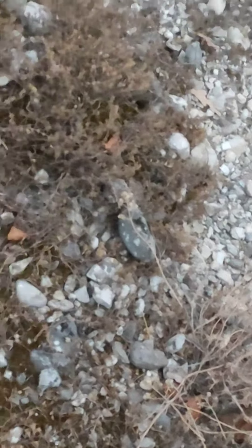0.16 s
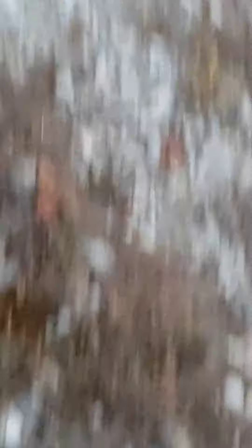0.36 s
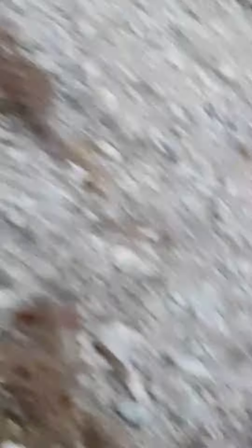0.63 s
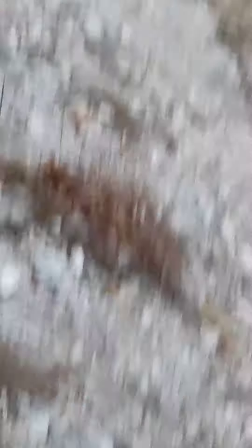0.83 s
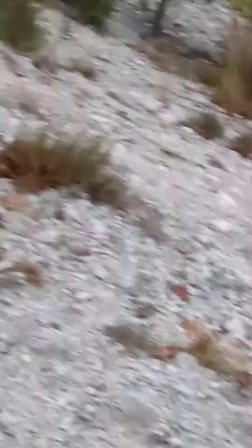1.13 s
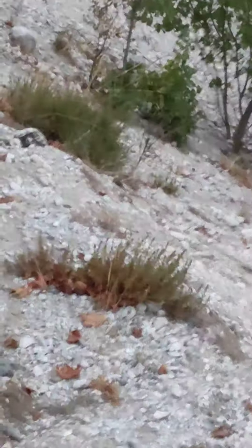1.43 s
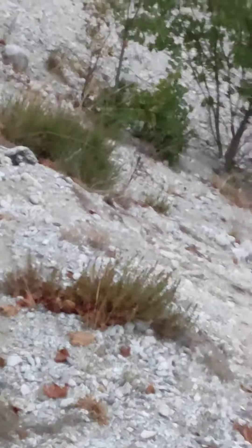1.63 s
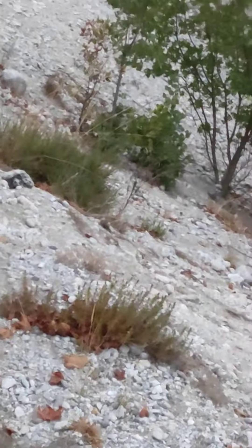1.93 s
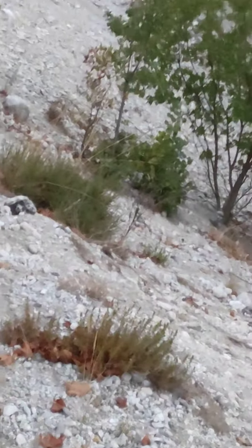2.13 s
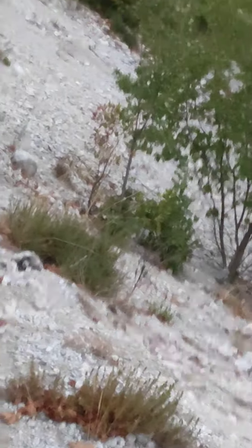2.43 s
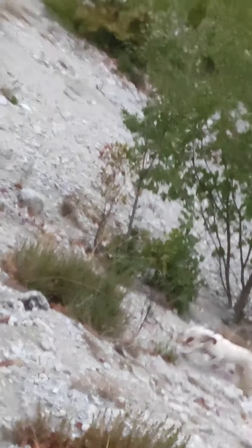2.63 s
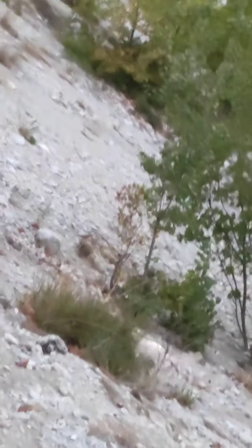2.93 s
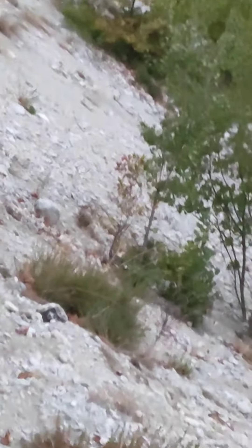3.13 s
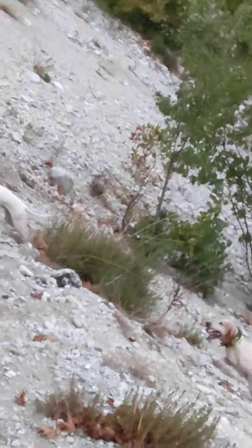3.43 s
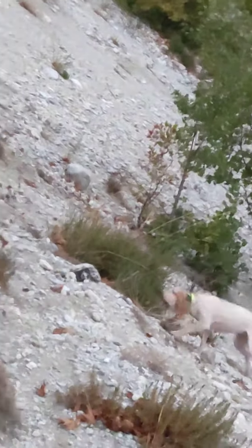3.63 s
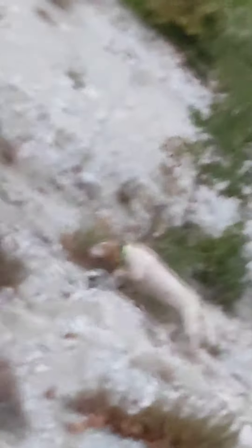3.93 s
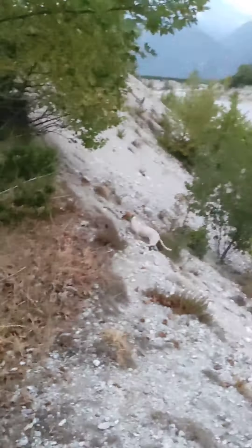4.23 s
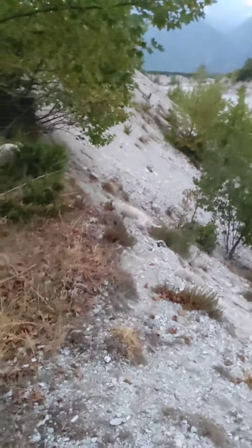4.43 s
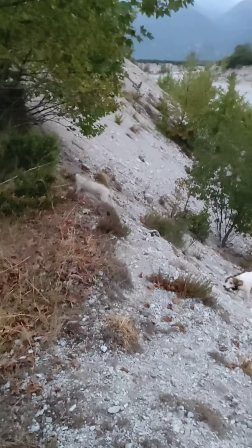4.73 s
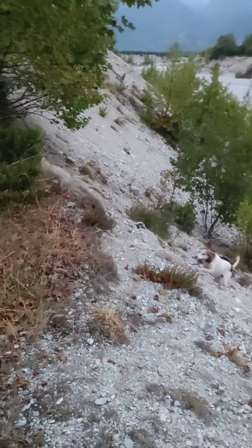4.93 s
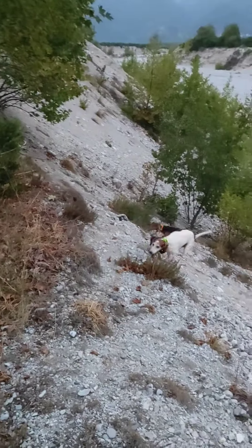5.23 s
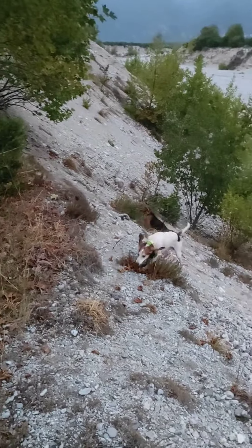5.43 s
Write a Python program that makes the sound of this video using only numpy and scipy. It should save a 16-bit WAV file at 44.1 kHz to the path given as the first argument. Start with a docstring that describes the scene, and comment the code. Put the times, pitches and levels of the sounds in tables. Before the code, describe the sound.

Outdoors on an open stony hillside, a few excited hounds give tongue. Soft hoarse yelps and stone knocks come first, then quick runs of barks and short held bays with thin whines between. The voices grow louder and clearer past the middle, then stop near five seconds, leaving sliding gravel, a crunching step and faint air. Handheld stereo phone, nearly dry with a weak hillside echo.

```python
"""Hounds give tongue on a scree slope: hoarse yelps and short bays open, while single stones knock underfoot.
Thin whines and a first snarl follow; then nearly pure bays ring out with yelps over them, until a last whine.
Each voice is a row of harmonics that breaks between clean tone and harsh, uneven cycles, plus breath noise.
Loose stones, made of tiny bursts of noise, slide throughout and swell under a few late steps.
Nearby rocks and the hillside return the voices faintly; a phone with two microphone ports hears it all."""
import sys
import numpy as np
from scipy import signal
from scipy.fft import rfft, irfft
from scipy.io import wavfile
from scipy.ndimage import uniform_filter1d

SR = 44100
rng = np.random.default_rng(int(sys.argv[2]) if len(sys.argv) > 2 else 0)


def master(y):
    """Save y as 16-bit WAV."""
    cut = np.clip(np.atleast_2d(y).T, -1, 1)
    pcm = np.round(cut * 32767)  # scale
    wavfile.write(sys.argv[1], SR, pcm.astype(np.int16))


N = 246078
TIME = np.arange(N) / SR  # s
PROGRESS = np.linspace(0, 1, 100)  # from the start of a call to its end
TOP_HZ = 15750  # nothing much is heard above this


def undb(db):
    """Turn decibels into a gain."""
    return 10 ** (np.asarray(db) / 20)


def unit(x):
    """Scale to an average strength (rms) of 1."""
    return x / np.sqrt(np.mean(x ** 2))


def along_hz(points, size):
    """Join the columns of a frequency table on a log axis, at the bins of a transform."""
    hz, *columns = np.transpose(points)
    bins = np.log(np.maximum(np.fft.rfftfreq(size, 1 / SR), 1))
    return [np.interp(bins, np.log(hz), column) for column in columns]


def colour(x, points):
    """Filter with the given (frequency, level) shape; its ring never comes before the sound."""
    size = 2048
    cepstrum = irfft(np.log(undb(along_hz(points, size)[0])))
    # folding the cepstrum onto its first half puts all of the ring after the sound
    response = irfft(np.exp(rfft(2 * cepstrum[:size // 2], size) - cepstrum[0]))
    return signal.fftconvolve(x, response)[:len(x)]


def wander(rate_hz, size):
    """Smooth random drift of rms 1: noise with the changes faster than rate_hz filtered down."""
    lead = SR // 4  # the filter settles here, then this part is dropped
    slow = signal.butter(3, rate_hz, fs=SR, output="sos")
    drift = signal.sosfilt(slow, rng.standard_normal(size + lead))
    return unit(drift[lead:])


def air(air_db=-55, apart=1.0):
    """Faint air over the valley: coloured noise that swells slowly and differs between the sides."""
    # colour of the open air: (frequency [Hz], level [dB])
    air_shape = [(25, -8.5), (100, -17.5), (190, 1), (600, -6.5), (2000, -12.5), (4000, -31)]
    mid, side = (unit(colour(rng.standard_normal(N), air_shape)) for _ in range(2))
    swell = undb(air_db + 2 * wander(2.6, N))
    return swell * np.array([mid + apart * side, mid - apart * side])


def handling(length_s=0.032):
    """Shifts of the hand and of the feet reach the phone as soft thuds of low noise."""
    # thuds: (time [s], level [dB], top frequency [Hz])
    thuds = [(.668, -39, 100.5), (3.46, -40, 230), (3.75, -49.5, 113.3)]
    return sum(undb(db) * np.exp(-abs(TIME - at) / length_s) * wander(top_hz, N)
               for at, db, top_hz in thuds)


def scree(grains_per_s=2200, slide_db=1, knock_db=-2, knock_s=0.0033, apart=0.77):
    """Countless tiny stone impacts, swelling under each step, and a few single knocks."""
    # sliding stones, before slide_db is added: (time [s], level [dB])
    slide = [(0, -51.5), (.45, -48.5), (.8, -49), (1.8, -48.5), (1.92, -44), (2.3, -44), (2.94, -50.5),
             (3.3, -44), (3.8, -46.5), (4.35, -48), (4.75, -47.5), (5, -46)]
    # feet digging into the scree: (time [s], level [dB], decay [s])
    steps = [(2.837, -26.5, 0.02), (3.555, -29, 0.017), (5.371, -34.5, 0.092)]
    # single stones knocking, before knock_db is added: (time [s], level [dB])
    knock_table = [(0.196, -26), (0.2325, -30), (0.3133, -27), (0.8996, -39), (0.9286, -38.5),
                   (2.5032, -29), (3.456, -25), (3.486, -38)]
    # ring of the small stones: (frequency [Hz], level [dB])
    stones = [(300, 2), (2500, 2.5), (3800, -0.5), (5500, 2.5), (7400, 11.5), (8800, 2), (9800, -9.5),
              (15000, -19)]
    step_rise_s = 0.0023  # a foot sinks in rather than strikes
    grain_spread_db = 2.2  # a few grains are much stronger than the rest

    slide_s, slide_levels_db = np.transpose(slide)
    flow = undb(np.interp(TIME, slide_s, slide_levels_db) + slide_db + 2.9 * wander(7.3, N))
    for at, step_db, decay_s in steps:
        rise = np.clip((TIME - at) / step_rise_s, 0, 1)
        flow = flow + undb(step_db) * rise * np.exp(-abs(TIME - at) / decay_s)
    hits = rng.random(N) < grains_per_s / SR
    sizes = hits * undb(grain_spread_db * np.minimum(rng.exponential(size=N), 5))
    knocks = sum(undb(db + knock_db) * (TIME > at) * np.exp(-abs(TIME - at) / knock_s)
                 for at, db in knock_table)
    strikes = flow * unit(sizes) + knocks
    stone_gain = np.sqrt(np.mean(undb(along_hz(stones, N)[0]) ** 2))
    mid, side = (colour(strikes * rng.standard_normal(N), stones) / stone_gain for _ in range(2))
    return np.array([mid + apart * side, mid - apart * side])


def hillside(x, t60_s=0.79, echo_db=-26, dull_hz=3000, build_s=0.24):
    """Stones and trees scatter a faint, dull tail, different at each port."""
    t = TIME[:SR]
    decay = np.exp(-np.log(1000) * t / t60_s)
    tail = rng.standard_normal((2, SR)) * decay * (1 - np.exp(-t / build_s))
    tail /= np.sqrt(np.sum(tail ** 2, axis=1, keepdims=True))
    tail = signal.sosfilt(signal.butter(1, dull_hz, fs=SR, output="sos"), tail)
    return undb(echo_db) * signal.fftconvolve(x[None], tail, axes=1)[:, :N]


def near_stones(x, scatter_db=-7, spread_s=0.033, small_hz=1100):
    """Nearby rocks scatter the voices, with opposite sign at each side; long waves pass them by."""
    t = TIME[:SR // 10]
    scatter = rng.standard_normal(len(t)) * np.exp(-t / spread_s)
    scatter /= np.linalg.norm(scatter)
    short_waves = signal.sosfilt(signal.butter(2, small_hz, "high", fs=SR, output="sos"), x)
    side = undb(scatter_db) * signal.fftconvolve(short_waves, scatter)[:N]
    return np.array([side, -side])


def call(start, length, pitch, first_db, second_db, top_db, rough, upper_db=-5,
         jitter=0.0385, jitter_hz=120, shimmer=0.28, rasp=0.98, rasp_hz=130,
         muzzle_db=-27, breathy=0.5, bounce=0.76, turn_hz=9, attack_s=.012, release_s=.014):
    """One call: the vocal folds beat evenly when clean, and stumble in period and force when rough."""
    # throat and mouth above the octave: (frequency [Hz], level [dB])
    throat = [(800, -19), (1300, -3.5), (1600, 2.5), (2150, -2), (2550, -16.5), (3000, -31), (4200, -60)]
    # thin high resonances of the muzzle: (frequency [Hz], level [dB])
    muzzle = [(1800, -13), (3000, -20.5), (4100, -23), (5600, -7), (6400, -9), (7400, -0.5), (8800, -17),
              (10000, -40.5)]
    alternation, hiss, tear = .5, 3.2, .018  # how strongly roughness alternates cycles, hisses, bends pitch
    mirror_rad, mirror_swing_rad = 1.572, 0.3  # ground reflection's lag per harmonic, and its drift

    end = start + length
    span = (TIME > start - attack_s) & (TIME < end + release_s)
    t = TIME[span]
    n = len(t)

    def stretch(curve):
        """Lay a number, or a curve over PROGRESS, along the time of the call."""
        return np.interp(t, start + length * PROGRESS, np.broadcast_to(curve, PROGRESS.shape))

    hz, first_db, second_db, top_db = (stretch(c) for c in (pitch, first_db, second_db, top_db))
    rough = np.clip(stretch(rough), 0, 1)

    # hoarse folds lurch in pitch over tens of ms and jitter from cycle to cycle
    lurch = (0.0042 + tear * rough) * wander(47.4, n)
    unsteady = lurch + jitter * rough * wander(jitter_hz, n)
    phase = 2 * np.pi * np.cumsum(hz * (1 + unsteady)) / SR

    # strong and weak cycles alternate now and then, which adds lines between the harmonics
    alternate = alternation * wander(37, n) * np.cos(phase / 2)
    force = 1 + np.tanh(rough * (shimmer * wander(89, n) + alternate))
    force /= np.sqrt(uniform_filter1d(force ** 2, size=900))  # slow changes of strength are evened out
    smear = np.clip(rasp * rough, 0, 1)

    def partial(k, share):
        """Harmonic k; a share of it is smeared into side bands."""
        skirt = wander(rasp_hz, n) * np.cos(k * phase) + wander(rasp_hz, n) * np.sin(k * phase)
        return np.sqrt(2 * (1 - share ** 2)) * np.cos(k * phase) + share * skirt

    # the ground mirrors the voice: as the head moves, single harmonics swell and sink
    mirror = mirror_rad + mirror_swing_rad * wander(turn_hz, n)
    pulses = 0
    for k in range(3, 20):
        reflected = 1 + bounce * np.cos(k * mirror)
        pulses = pulses + np.sqrt(2) * reflected * np.cos(k * phase) * (k * hz < TOP_HZ)
    turbulence = rng.standard_normal(n) * (1.82 + .5 * np.cos(phase))  # air noise peaks once a cycle
    source = force * (np.sqrt(1 - smear ** 2) * pulses + hiss * smear * turbulence)

    # the fundamental feels the uneven force least
    fundamental = undb(first_db) * np.sqrt(force) * partial(1, smear ** 2)
    octave = undb(second_db) * force * partial(2, smear)
    upper = undb(top_db + upper_db) * colour(source, throat)

    # the muzzle's airy sheen follows the whole effort, more gently than the loudness does
    effort = np.sqrt(undb(first_db) ** 2 + undb(second_db) ** 2 + (2 * undb(top_db)) ** 2)
    sheen = undb(muzzle_db) * effort ** 0.74 * colour(source + breathy * turbulence, muzzle) / 2

    ramp = np.minimum((t - start) / attack_s + .5, (end - t) / release_s + 1)
    gate = np.sin(np.pi / 2 * np.clip(ramp, 0, 1)) ** 2
    out = np.zeros(N)
    out[span] = gate * (fundamental + octave + upper + sheen)
    return out


def snarls():
    """Air torn between the teeth during two sharp barks: short swells of hiss."""
    # snarls: (start [s], length [s], level at the peak of the swell [dB])
    snarl_table = [(0.663, 0.15, -38), (3.883, 0.14, -37.5)]
    # ring of the bared teeth: (frequency [Hz], level [dB])
    teeth = [(1500, -30), (2300, -3), (2950, 0.5), (3500, -15.5), (4500, -22.5), (8000, -36)]
    swell = sum(undb(db) * np.sin(np.pi * np.clip((TIME - start) / length, 0, 1))
                for start, length, db in snarl_table)
    return swell * unit(colour(rng.standard_normal(N), teeth))


def whine(start, length, first_hz, last_hz, first_db, last_db, overtones_db, rough):
    """A thin squeak: one glide of pitch, slowing as it lands, and one glide of level."""
    glide_power, upper_re_octave_db = 1.7, 7.5
    pitch = last_hz + (first_hz - last_hz) * (1 - PROGRESS) ** glide_power
    db = first_db + (last_db - first_db) * PROGRESS
    octave_db = db + overtones_db
    return call(start, length, pitch, db, octave_db, octave_db + upper_re_octave_db, rough,
                attack_s=.014, release_s=0.017)


def yelp(start, length, first_hz, last_hz, first_db, second_db, top_db, late_db, rough):
    """A hoarse bark, harshest at both ends, whose pitch gives way as the breath runs out."""
    scoop, attack_db, attack_s = 0.0381, 9.5, .012  # it starts flat (share of pitch) and soft
    sag_power, fade_power = 2.6, 2.94  # pitch and breath hold, then give way late
    swell_db = 10.5  # the fundamental peaks mid-yelp
    closing_db = 2.5  # the octave sinks as the jaws close
    settle = 0.3  # share of roughness added at the ends and taken away mid-yelp

    middle = 4 * PROGRESS * (1 - PROGRESS)  # 0 at both ends, 1 halfway
    onset = np.exp(-length * PROGRESS / attack_s)
    pitch = first_hz * (1 - scoop * onset) + (last_hz - first_hz) * PROGRESS ** sag_power
    fade_db = attack_db * onset + late_db * PROGRESS ** fade_power
    return call(start, length, pitch,
                first_db - swell_db * (1 - middle),
                second_db - fade_db - closing_db * PROGRESS,
                top_db - fade_db,
                rough * (1 + settle * (1 - 2 * middle)), release_s=0.028)


def bay(start, length, hz, arch, lift, lift_s, swell_s, fade_s, first_db, second_db, top_db, rough):
    """A held note: scoops up to pitch, rounds to a purer tone, sags, and bends (mostly up) as it fades."""
    scoop, scoop_s = 0.0392, 0.016  # it starts flat by this share of its pitch
    sag_per_s = .13  # share of pitch lost each second as the breath runs down
    swell_db, full_fade_db = 19.5, 15  # depth of the fundamental's swell and fade
    closing_db, octave_fade = 12, 0.44  # the octave sinks as the mouth rounds; its share of the fade
    attack_db, attack_s = 5, 0.0082  # the overtones take a moment to build
    onset_rough = 0.073  # extra roughness before the note settles

    t = length * PROGRESS
    flat_start = scoop * np.exp(-t / scoop_s)
    hump = arch * np.sin(np.pi * PROGRESS) ** 4
    end_bend = lift * np.exp((t - length) / lift_s)
    pitch = hz * (1 - flat_start - sag_per_s * t + hump + end_bend)
    opening = np.clip(1 - t / swell_s, 0, 1)
    fade_db = full_fade_db * np.clip(1 - (length - t) / fade_s, 0, 1)
    build_db = attack_db * np.exp(-t / attack_s)
    return call(start, length, pitch,
                first_db - swell_db * opening - fade_db,
                second_db - build_db - closing_db * (1 - opening) ** 4 - octave_fade * fade_db,
                top_db - build_db - fade_db * (fade_db / full_fade_db) ** 4,
                rough + onset_rough * opening)


def hounds(chest_hz=400):
    """Bays, hoarse yelps, whines and snarls overlap; a small chest radiates little bass."""
    # Levels and pitches are starting points that each call then shapes; roughness is limited to 0-1.
    # held notes: (start [s], length [s], pitch [Hz], arch [share of pitch], end bend [share of pitch],
    # bend time [s], swell [s], fade [s], fundamental [dB], octave [dB], upper harmonics [dB], roughness)
    bays = [ (0.051, .12, 602.3, -.04, -0.059, .015, 0.018, 0.027, -21.5, -26, -34, 0.21),
            (0.164, 0.12, 623, -0.0071, -0.035, .03, 0.034, 0.026, -30, -28.5, -36.5, 0.62),
            (1.12, .11, 596.6, -0.035, 0.031, 0.041, 0.019, 0.058, -19, -35.5, -33.5, 0.23),
            (1.361, 0.37, 642, .06, 0.43, 0.025, 0.08, 0.11, -14.5, -27, -24.5, 0.15),
            (1.974, 0.18, 588.6, -0.0067, 0.57, 0.029, 0.046, 0.13, -17.5, -21, -37, 0.36),
            (2.222, 0.16, 642, 0, 0.16, 0.012, .055, 0.029, -11.5, -27.5, -24.5, 0.12),
            (2.567, 0.18, 630.6, -.01, 0.32, 0.024, .06, 0.064, -11, -21, -25.5, 0.089),
            (2.99, 0.18, 608.7, .025, 0.26, .08, 0.071, 0.051, -15.5, -23, -19, .12),
            (3.192, 0.077, 592.5, 0, 0.2, .04, .015, 0.083, -21.5, -27, -25, 0.5),
            (3.447, 0.15, 584, -0.01, -0.077, 0.065, .022, 0.09, -8.5, -17.5, -39.5, 0.15),
            (3.549, 0.2, 637.6, 0, 0.2, .018, 0.037, .05, -8.5, -24.5, -22, 0.29),
            (4.014, .2, 639.6, 0, .04, 0.017, .06, .04, -8, -20.5, -23.5, 0.19),
            (4.416, 0.21, 622.2, 0, 0.23, 0.01, 0.054, .1, -10, -22.5, -22.5, 0.08),
            (4.821, 0.12, 616.6, 0, -0.072, 0.014, .06, 0.031, -15.5, -49, -23.5, 0.76), ]
    # hoarse barks: (start [s], length [s], first pitch [Hz], last pitch [Hz], fundamental [dB],
    # octave [dB], upper harmonics [dB], late fade [dB], roughness)
    yelps = [ (.008, 0.052, 544, 471.5, -38, -28.5, -26, 4.5, 0.31),
             (0.164, 0.17, 518, 575, -45, -28, -39.5, 8, 0.36),
             (0.352, 0.029, 571, 425, -31, -35.5, -40.5, 8.5, 0.68),
             (0.698, 0.093, 948, 741, -21, -23, -24.5, 17, 1.07),
             (1.083, 0.099, 514, 494, -55, -16.5, -19.5, 12.5, 0.56),
             (1.195, 0.037, 534, 541, -46, -17.5, -27.5, 7.5, 0.17),
             (1.391, 0.049, 557, 500, -23.5, -19, -21, 10, 0.37),
             (1.44, .04, 512.6, 524, -43, -21, -25.5, 5, .25),
             (1.482, .022, 512, 405, -40.5, -27.5, -28, 10, .3),
             (1.527, 0.084, 541, 531, -48, -33, -45.5, 3, .45),
             (1.96, 0.072, 563.6, 510, -26.5, -13.5, -20.5, 8, .28),
             (2.028, 0.096, 500, 533, -48.5, -25, -26.5, 8, 0.76),
             (2.222, .13, 575, 516, -31, -17.5, -21.5, 10.5, 0.4),
             (2.372, 0.098, 552, 604, -55, -29, -43.5, 2.5, 0.34),
             (2.561, 0.096, 552, 477, -52.5, -20.5, -19, 8, 1.06),
             (3.045, .15, 588, 474.2, -19, -16, -19.5, 10.5, 0.59),
             (3.406, .056, 881, 643, -16.5, -19.5, -19.5, 2.5, 1.1),
             (3.436, 0.048, 595.7, 569, -23, -17.5, -34, 2, .45),
             (3.566, .135, 555.5, 535, -38, -26, -20.5, 2, .6),
             (3.904, .042, 841, 760, -10.5, -33, -10.5, 8, 0.46),
             (4.182, .13, 565.2, 432, -22.5, -21.5, -19, 18, 0.61),
             (4.209, 0.079, 663.6, 729, -18, -41, -19.5, 9.5, 0.64),
             (4.815, .13, 550, 442, -20.5, -16, -22.5, 5.5, 0.65), ]
    # gliding squeaks: (start [s], length [s], first pitch [Hz], last pitch [Hz], first level [dB],
    # last level [dB], octave against the fundamental [dB], roughness)
    whines = [ (0.683, .022, 1490, 1097, -28.5, -28.5, -14, 0.93),
              (0.799, 0.049, 633, 883, -36.5, -34.5, -16, .3),
              (1.063, .018, 813, 890, -21.5, -18.5, -4.5, 0.08),
              (1.303, 0.066, 1560, 1260, -38, -23, -16.5, 0.3),
              (1.371, 0.028, 1242, 1052, -16, -22.5, -5, .12),
              (1.928, 0.031, 781, 835, -38, -19.5, -1, 0.47),
              (2.174, .044, 1276, 1410, -38, -25.5, -21, .05),
              (2.49, 0.067, 945, 876, -24.5, -18, -8.5, 0.09),
              (2.744, 0.017, 1145, 1094, -28.5, -35, -19.5, 0.2),
              (3.02, 0.018, 878, 861, -24.5, -21.5, -3, .1), (3.39, 0.022, 796, 929, -16, -13.5, -18, 0.2),
              (3.548, 0.025, 967, 784, -16.5, -28.5, -17.5, 0.4),
              (3.677, 0.082, 1035, 1185, -36, -27.5, -21.5, 0.4),
              (3.762, .105, 1171, 977, -38, -32, -3.5, 0.3),
              (3.87, 0.017, 1557, 1470, -20.5, -23, -14.5, .06),
              (3.899, 0.038, 1193, 906, -11, -19.5, -9.5, .95),
              (3.943, .046, 753, 749, -9, -10, -17.5, 0.11),
              (3.997, 0.02, 777.4, 737, -10.5, -22.5, -27.5, .4),
              (4.006, 0.016, 969, 840, -12, -28, -11, 0.1),
              (4.416, 0.017, 958, 754, -13.5, -32.5, -13, 0.2),
              (4.76, 0.034, 506.5, 741, -33.5, -25, -13, .4),
              (4.789, 0.019, 781, 795, -18.5, -13, -16.5, 0), (5.299, .04, 1850, 1670, -47, -50, -20, 0.8),
              ]
    voices = sum(bay(*row) for row in bays)
    voices = voices + sum(yelp(*row) for row in yelps)
    voices = voices + sum(whine(*row) for row in whines)
    voices = voices + snarls()
    return signal.sosfilt(signal.butter(6, chest_hz, "high", fs=SR, output="sos"), voices)


def scene():
    """Add up the hounds, their reflections, the scree, the air and the handling thuds."""
    voices = hounds()
    return voices + near_stones(voices) + hillside(voices) + scree() + air() + handling()


def record(dry):
    """The phone's body shades and delays each port differently; the top is cut."""
    # the two ports: (frequency [Hz], left minus right [dB], left leads by [rad])
    port_table = [(380, 5, -.2), (620, .4, -1.15), (1150, 0, -.8), (2000, 2.7, .3), (5000, -1, 1.4),
                  (7600, -6, 2), (12000, -1.5, 1)]
    balance_db, lead = along_hz(port_table, N)
    sides = np.array([[.5], [-.5]])  # left and right each take half of the difference
    ports = undb(sides * balance_db) * np.exp(1j * sides * lead)
    ports /= np.sqrt(np.mean(abs(ports) ** 2, axis=0))
    heard = irfft(rfft(dry) * ports, N)
    return signal.sosfilt(signal.ellip(8, .2, 70, TOP_HZ, fs=SR, output="sos"), heard)


dry = scene()
out = record(dry)
master(out)
```